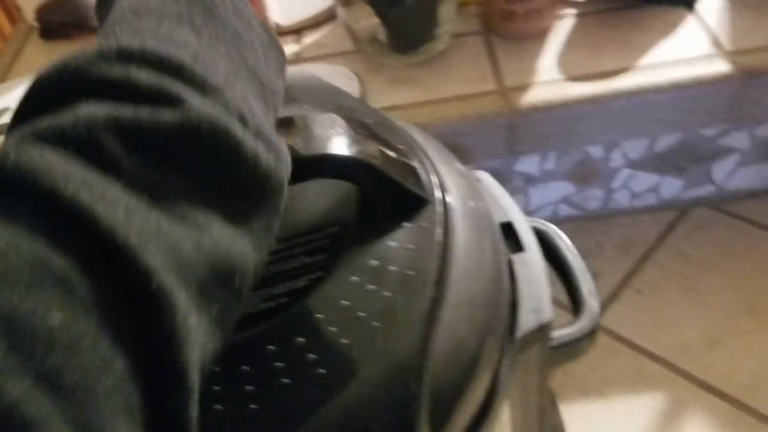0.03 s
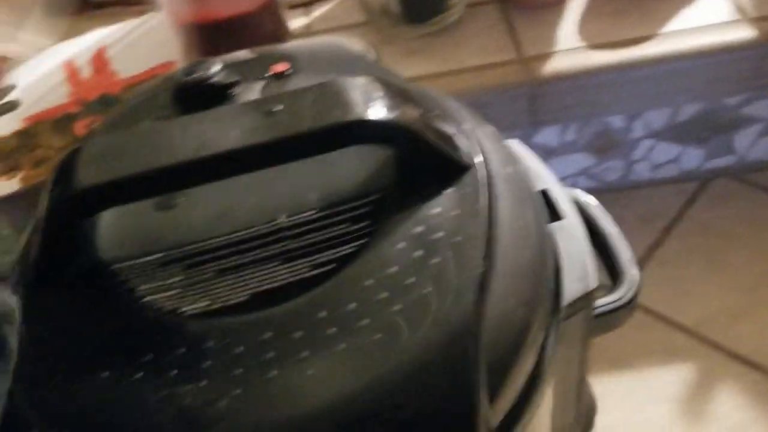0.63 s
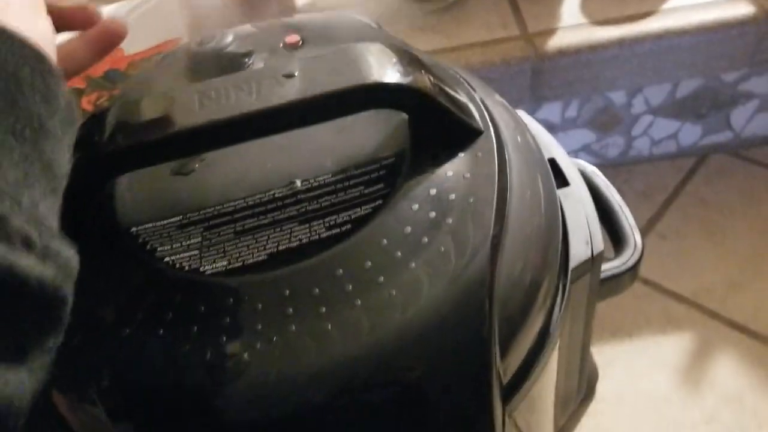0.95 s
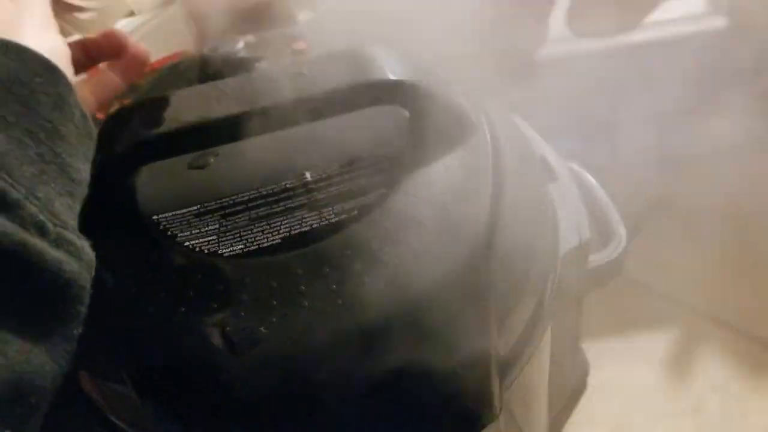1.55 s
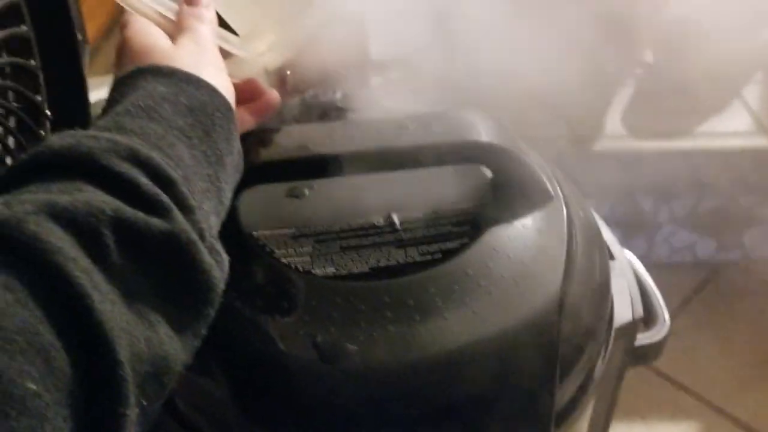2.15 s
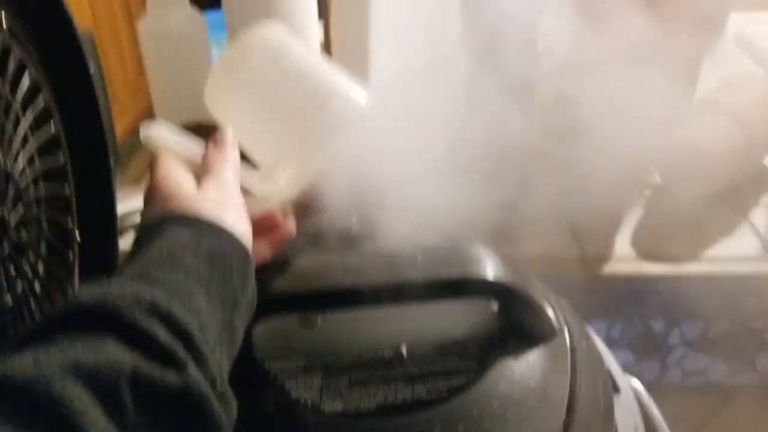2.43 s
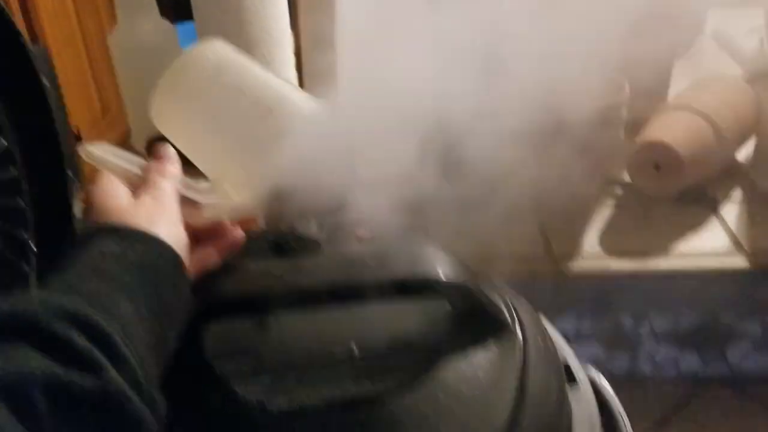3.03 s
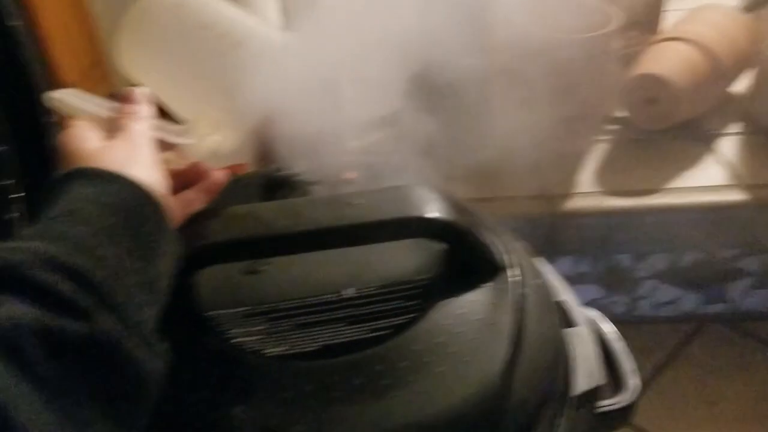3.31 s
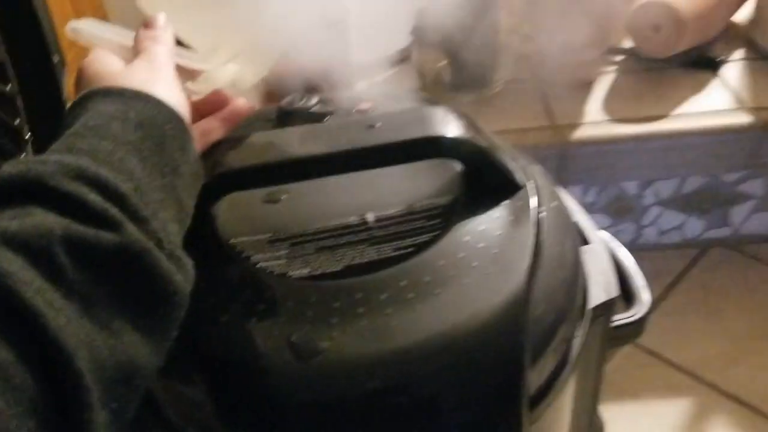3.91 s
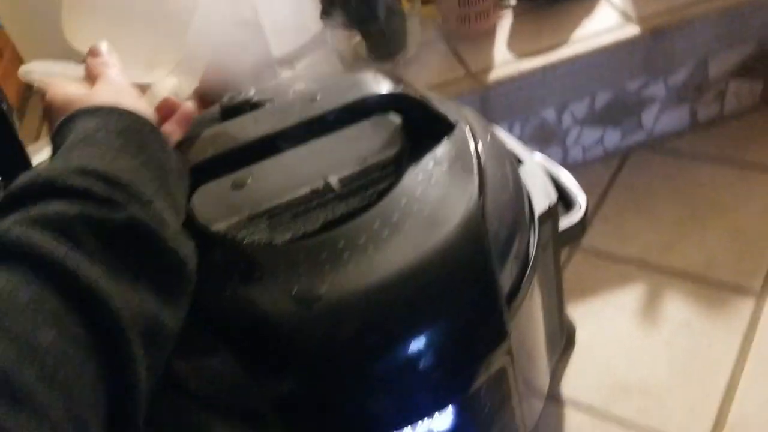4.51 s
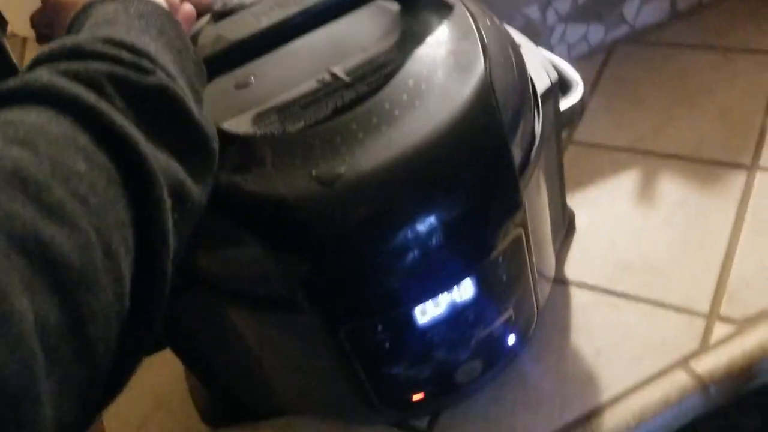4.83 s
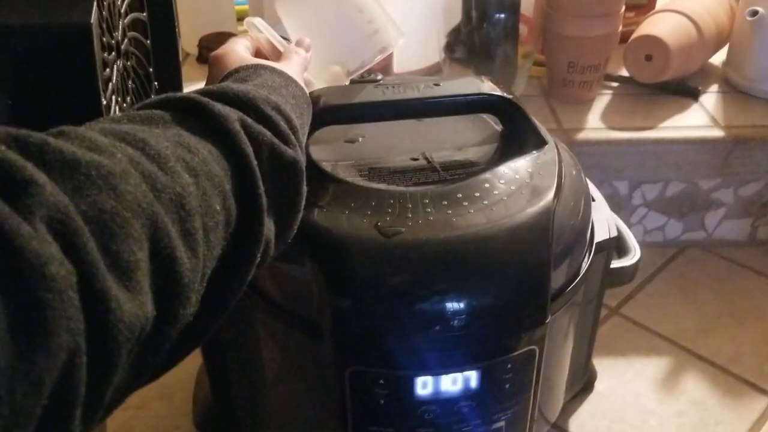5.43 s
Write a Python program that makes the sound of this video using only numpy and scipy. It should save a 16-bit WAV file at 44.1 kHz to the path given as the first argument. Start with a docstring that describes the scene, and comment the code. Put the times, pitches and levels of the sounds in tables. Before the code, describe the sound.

Steam escapes from a pressure cooker valve for the whole five and a half seconds, close to a hand-held stereo microphone in a small tiled kitchen. It is a bright, dense, spraying hiss with a weaker, dull roar underneath. Right at the start a short, hollow knock with a quick rattle rings the pot. The hiss is strongest here, and the valve spits once at about 0.3 seconds. Flecks of spray pop softly on the microphone, left at 0.5 seconds, right at 0.6, and more faintly left at 3.2. Thin, breathy whistles slide and swell within the hiss, most clearly around 1, 3.7 and 4.4 seconds. The tone shifts as the microphone turns, near 1.8 and 4 seconds. From about 4.6 seconds the hiss eases a little but keeps going. At around 5.4 seconds a sleeve faintly bumps and rubs the pot.

```python
"""A small tiled kitchen: steam blows out of the release valve of an electric pressure cooker.
The jet roars, hisses and sprays through the resonances of the valve cap and a cup held over it,
while a hand-held stereo microphone moves about close by. Knocks ring the pot at the start,
three flecks of spray pop on the microphone ports, and a sleeve rubs the pot near the end."""
import sys
import numpy as np
from scipy import signal
from scipy.fft import rfft, irfft
from scipy.io import wavfile
from scipy.ndimage import uniform_filter1d, map_coordinates

SR = 44100
rng = np.random.default_rng(int(sys.argv[2]) if len(sys.argv) > 2 else 0)


def dump_mix(stems):
    """Bounce the given channels to the path in sys.argv[1] as a 16-bit WAV at rate SR."""
    frames = np.atleast_2d(stems).T  # one column per channel
    limited = np.clip(frames, -1, 1)  # hard clip at full scale
    pcm = np.round(limited * 32767).astype(np.int16)
    wavfile.write(sys.argv[1], SR, pcm)


N = 245637
TIME = np.arange(N) / SR
HZ = np.maximum(np.fft.rfftfreq(N, 1 / SR), 1)

# microphone move: t/s, turn (0 facing the valve .. 1 turned furthest)
TURN = [(0, 1), (.75, 0.96), (1.3, 0.97), (1.68, 0.94), (1.95, 0.2), (3.2, 0.25), (3.85, 0.091),
        (4.35, 0.85), (5.57, 0.79)]
# pan (left minus right) of roar, hiss and spray: facing the valve/dB, added at full turn/dB
REGISTER_PANS = [(2, 0.5), (-4.6, 1), (2, 2.5)]


def steam(roar_room_db=1.0, hiss_room_db=2.5, spray_room_db=-4.5, hiss_from_hz=3320, spray_from_hz=8110):
    """The jet in three registers plus its resonances, each beamed its own way, with its own pan."""
    colour = valve_colour()
    turn, = in_time(TURN)
    near = near_echoes(irfft(rfft(jet()) * colour, N), turn)
    room = diffuse() * colour
    # roar and hiss reach the right port later as the microphone turns; the spray stays in step
    roar = rfft([near[0], delayed(near[1], ms=0.15 * turn)]) + from_db(roar_room_db) * room
    hiss = rfft([near[0], delayed(near[1], ms=0.16 * turn)]) + from_db(hiss_room_db) * room
    spray = rfft(near) + from_db(spray_room_db) * room
    spray *= panned(db=5 * (1 - below(13500, order=30)))  # the very top is beamed to the left
    under_hiss, under_spray = below(hiss_from_hz, order=12), below(spray_from_hz, order=60)
    registers = roar * under_hiss, hiss * (1 - under_hiss) * under_spray, spray * (1 - under_spray)
    out = np.zeros((2, N))
    for spectrum, db, (facing_db, turned_db) in zip(registers, jet_levels(), REGISTER_PANS):
        out += rms_one(irfft(spectrum, N)) * from_db(db) * panned(facing_db + turned_db * turn)
    return shimmer(out + cap_tones(irfft(hiss, N), irfft(spray, N)))


def jet(spit_db=1.06, spit_rate=350):
    """Wet steam: droplets tearing through the nozzle roughen the flow."""
    return rng.standard_normal(N) * from_db(spit_db * drift(spit_rate))


# fader ride of the jet at the microphone: t/s, nozzle hiss level/dB, fine spray level/dB
FLOW = [(0, -25, -23), (.245, -27.5, -27), (.295, -33, -26.5), (.42, -30, -25.5), (.54, -30, -24.5),
        (.84, -30.5, -25.5), (.92, -32.5, -25), (1.06, -31.5, -25), (1.3, -33, -27), (1.7, -32.5, -27.5),
        (1.87, -33.3, -29), (2.38, -32.5, -27), (2.52, -32.5, -27), (3.3, -32.5, -26.5), (3.72, -31, -27),
        (3.98, -31.5, -25.5), (4.07, -32.5, -28), (4.2, -29, -25.5), (4.64, -35.5, -28.5),
        (5.26, -35.5, -30.5), (5.57, -35, -30)]
# fader ride of the duller roar underneath: t/s, level/dB
ROAR = [(0, -38.5), (.35, -46), (.95, -42.5), (1.45, -44.5), (2.2, -45), (2.95, -45), (3.8, -42.5),
        (4.5, -43.5), (4.95, -44.5), (5.57, -43.5)]


def jet_levels(waver_db=0.72, waver_rate=5, spurt_hiss_db=3.5, spurt_spray_db=-2.5):
    """Roar, hiss and spray in dB: the valve spits once, and the whole flow wavers."""
    roar, = in_time(ROAR)
    hiss, spray = in_time(FLOW)
    spurt = swell(at_s=0.259, length_s=0.008)
    levels = np.array([roar, hiss + spurt_hiss_db * spurt, spray + spurt_spray_db * spurt])
    return levels + waver_db * drift(waver_rate)


# tone curve of the jet's turbulence: f/Hz, relative level/dB
TURBULENCE = [(20, -45), (60, -30.5), (160, -27.5), (230, -28), (400, -23.5), (600, -23), (1150, -26),
              (1450, -22), (2450, -14), (3050, -19), (3750, -14), (4600, -9.5), (5500, -3.5), (6300, -3),
              (7400, -0.5), (8900, -5), (12000, -1.5), (15800, -4)]
# steady resonances of the valve and its cap: f/Hz, width/Hz, boost/dB
VALVE_PEAKS = [(796, 36, 6.5), (1950, 160, 4.5), (7630, 39, 7.5), (10950, 190, 5.5)]


def valve_colour():
    """Gain per frequency: broad turbulence boosted at each resonance of the valve."""
    hz, db = np.transpose(TURBULENCE)
    boosts = sum(boost / (1 + (2 * (HZ - centre) / width) ** 2) for centre, width, boost in VALVE_PEAKS)
    return from_db(np.interp(np.log(HZ), np.log(hz), db) + boosts)


# gliding resonances of the valve and the cup over it, each a curve of t/s, f/Hz, level/dB
WHISTLE = [(0, 5400, -63), (.8, 5320, -41), (1.1, 5250, -41), (1.65, 5400, -41), (1.85, 5760, -60),
           (2.6, 5800, -50), (3.2, 5730, -47), (3.75, 5730, -41), (4.05, 5500, -53), (4.42, 5340, -33.5),
           (4.65, 5280, -38), (5.57, 5530, -50)]  # half-whistle low in the hiss, higher while the cup is close
RUSH = [(0, 5770, -34), (.12, 5900, -39), (.25, 6200, -26), (.29, 6250, -34), (.37, 6300, -33),
        (.46, 6240, -53), (.62, 6160, -43), (.85, 6300, -46), (1.0, 6400, -67), (1.7, 6400, -44),
        (1.9, 6570, -54), (2.65, 7300, -67), (3.2, 7100, -62), (3.95, 6700, -60), (4.2, 6450, -44),
        (4.55, 6280, -36), (5.57, 6320, -35.5)]  # broad rush of the jet's core
CORE = [(0, 6560, -50), (.3, 6700, -40), (.5, 6300, -54), (.85, 6600, -56), (1.3, 6280, -46),
        (1.74, 6420, -42), (1.9, 6450, -42), (2.15, 6530, -42), (2.55, 6340, -51), (3.0, 6500, -45),
        (3.5, 6400, -51), (4.3, 6100, -43), (4.9, 6320, -40.5), (5.57, 6300, -46)]  # narrow ring within the rush
UPPER_RING = [(3.9, 6550, -90), (4.1, 6500, -55), (4.4, 6620, -35), (4.7, 7130, -39.5), (5.3, 6670, -41.5),
              (5.57, 6750, -44)]  # rises above it as the microphone sinks beside the pot
KEEN = [(0, 7050, -58), (.24, 7200, -33), (.35, 7260, -54), (.58, 7150, -48), (.8, 6900, -47),
        (1.03, 6720, -35), (1.25, 6880, -57), (1.7, 7070, -40), (1.87, 6740, -44), (2.75, 6730, -43.5),
        (3.3, 6680, -47), (3.72, 6640, -31), (4.0, 6820, -39), (4.6, 6740, -49), (4.9, 6840, -44)]  # keen note beamed to the left
SIZZLE = [(.14, 7590, -37.5), (.33, 7600, -46), (.56, 7530, -33.5), (.84, 7650, -37), (1.0, 7670, -48),
          (1.9, 7800, -51), (3.2, 8100, -41), (3.72, 7650, -45), (4.25, 7850, -43), (4.6, 7850, -43),
          (5.57, 7700, -56)]  # the valve's edge, strongest while the pressure is highest
HOLLOW = [(0, 2050, -53), (.35, 2100, -52), (.9, 2150, -53), (1.35, 2160, -46.5), (1.9, 2160, -46.5),
          (2.7, 2160, -50), (3.8, 2120, -51), (4.35, 2170, -55), (4.9, 2110, -48.5), (5.57, 2200, -58)]  # hollow note of the cap
THIN = [(1.2, 10000, -64), (1.7, 9870, -47), (2.5, 9800, -51), (3.3, 9670, -48), (3.72, 9700, -37),
        (4.1, 9320, -52), (5, 10000, -53)]  # thin note in the spray while the cup is in the jet
OVERTONE = [(.4, 11600, -48), (.55, 11700, -35), (.85, 12160, -47), (1.2, 11800, -56), (1.7, 11200, -39),
            (1.95, 11900, -56), (3.8, 11600, -53), (4.9, 11600, -61)]  # high glint that glides up after the opening burst
TOP_OVERTONE = [(0, 13000, -51), (.35, 13100, -54), (.52, 13100, -34), (.68, 12700, -44), (.92, 12900, -39),
                (1.15, 13400, -50), (1.9, 12600, -51), (2.7, 12260, -44), (4.9, 12500, -61)]  # a second glint above it
# resonances fed by the hiss and by the spray: curve, width/Hz, pan/dB
HISS_TONES = [(WHISTLE, 230, -2), (RUSH, 810, -31.5), (CORE, 63, -13), (UPPER_RING, 98, -20),
              (KEEN, 150, 60), (SIZZLE, 220, 11)]
SPRAY_TONES = [(HOLLOW, 132, 9.5), (THIN, 77, 9.1), (OVERTONE, 280, 18), (TOP_OVERTONE, 220, 10)]


def cap_tones(hiss, spray):
    """Cavities pick breathy tones out of the flow; they slide and swell as cup and microphone move."""
    out = np.zeros((2, N))
    for flow, tones in ((hiss, HISS_TONES), (spray, SPRAY_TONES)):
        for curve, width, pan_db in tones:
            hz, db = in_time(curve)
            out += gliding_band(flow, hz, width) * from_db(db) * panned(pan_db)
    return out


# close reflections, lid to left and right port, then counter to left and right:
# starting delay/ms, slide/(ms per s), added at full turn/ms
ECHOES = [(0.661, 0.0596, -0.19), (0.892, -0.104, -0.058), (1.08, -0.021, 0.0083), (0.981, 0.0266, 0.035)]


def near_echoes(x, turn, lid_db=-11, counter_db=-14, sway_ms=0.055, sway_rate=0.88):
    """Direct sound and two reflections: a comb that sweeps as the hand travels, turns and sways."""
    paths_ms = [ms + ms_per_s * TIME + turned_ms * turn + sway_ms * drift(sway_rate)
                for ms, ms_per_s, turned_ms in ECHOES]
    off_lid, off_counter = delayed(x, paths_ms).reshape(2, 2, N)
    return x + from_db(lid_db) * off_lid + from_db(counter_db) * off_counter


def shimmer(x, slow_db=2.7, fast_db=2.0, flicker_from_hz=7000, size=1024):
    """Narrow bands of the steam swell and fade slowly at each port; the treble also flickers at both."""
    hz, _, cells = signal.stft(x, SR, nperseg=size)

    def patches(channels, length_s, bins):
        """Random field of spread 1, smooth in time and frequency."""
        field = rng.standard_normal((channels, *cells.shape[1:]))
        for _ in range(2):
            field = uniform_filter1d(field, max(1, int(length_s * 2 * SR / size)), axis=2, mode="wrap")
            field = uniform_filter1d(field, bins, axis=1, mode="wrap")
        return field / field.std()

    treble = (hz ** 4 / (hz ** 4 + flicker_from_hz ** 4))[:, None]
    depth = np.interp(hz, [0, 5000], [.35, 1])[:, None]  # long waves change less as the hand moves
    swell_db = slow_db * depth * patches(channels=2, length_s=.25, bins=2)
    flicker_db = fast_db * treble * patches(channels=1, length_s=.025, bins=15)
    return signal.istft(cells * from_db(swell_db + flicker_db), SR, nperseg=size)[1][:, :N]


# hits on the pot: t/s, relative level/dB, contact softness/ms
KNOCKS = [(0.0347, -18, 0.062), (0.0425, -49, 0.18), (0.052, -33, 0.36), (.066, -28, 0.97), (.097, -22, 2),
          (0.272, -43.5, 0.23)]
# ring of the pot and lid: f/Hz, relative level/dB, t60/s
POT_MODES = [(223, -14.5, 0.1), (316, -8, 0.24), (363, -4.5, 0.19), (398, 1, 0.049), (500, -3.5, 0.07),
             (643, 7.5, 0.026), (708, 10, 0.024), (883, 4, 0.029), (933, -3, 0.072), (1060, -5, 0.033),
             (1260, -16, .08), (1435, -12, 0.037)]


def knocks(level_db=-5.5, room_db=-5.0, pan_db=4.0):
    """Hits ring the pot; a soft contact is a long push that misses the higher modes."""
    force = np.zeros(N)
    for s, db, soft_ms in KNOCKS:
        push = np.exp(-np.abs(TIME - s) * 1000 / soft_ms) * (TIME >= s)
        force += from_db(db) * push / push.sum()
    body = sum((-1) ** k * from_db(db) * ring(force, hz, t60) for k, (hz, db, t60) in enumerate(POT_MODES))
    tail = signal.fftconvolve(body[None], kitchen(), axes=1)[:, :N]
    return from_db(level_db) * (body * panned(pan_db) + from_db(room_db) * tail)


# flecks of spray on a port: t/s, level/dB, pan/dB, low-pass f/Hz
POPS = [(0.4778, -20.5, 36, 1500), (.599, -19.5, -29, 1500), (3.231, -23.5, 32, 600)]


def pops(swing_hz=58, swing_s=0.011, spike_s=0.0012, spike_share=0.6):
    """A fleck on a port gives a pressure spike, then the diaphragm swings back slowly."""
    out = np.zeros((2, N))
    for s, db, pan_db, top_hz in POPS:
        age = np.maximum(TIME - s, 0)
        swing = np.exp(-age / swing_s) * np.cos(2 * np.pi * swing_hz * age + np.pi / 3)
        push = (TIME >= s) * (spike_share * np.exp(-age / spike_s) + (1 - spike_share) * swing)
        lowpass = signal.butter(2, top_hz, fs=SR, output="sos")
        out += from_db(db) * signal.sosfilt(lowpass, push + 1e-18) * panned(pan_db)
    return out


def sleeve(band_hz=(195, 400), grip_db=-1.5, grip_rate=60, bump_db=-47.5, drag_db=-55.5):
    """Cloth bumps and drags on the pot, gripping and slipping; the shell passes only a dull rumble."""
    drag_from_s, drag_to_s, fade_s = 5.34, 5.57, .03
    band = signal.butter(3, band_hz, "band", fs=SR, output="sos")
    friction = rng.standard_normal(N) * from_db(grip_db * drift(grip_rate))
    rub = rms_one(signal.sosfilt(band, friction))
    bump = swell(at_s=5.372, length_s=0.012)
    drag = np.clip(np.minimum(TIME - drag_from_s, drag_to_s - TIME) / fade_s, 0, 1)
    return rub * (from_db(bump_db) * bump + from_db(drag_db) * drag)


def kitchen(t60_s=0.16, predelay_s=.004):
    """The tiled room's short answer to a click, at both ports."""
    tail = irfft(diffuse(), N) * from_db(-60 * TIME / t60_s) * (TIME > predelay_s)
    return rms_one(tail)[:, :SR // 2] / np.sqrt(N)


def diffuse(alike_below_hz=450):
    """Spectra of sound arriving from all round the room; long waves reach both ports alike."""
    mid, side = rfft(rng.standard_normal((2, N)))
    alike = below(alike_below_hz, order=2)
    return (np.sqrt(1 + alike) * mid + np.sqrt(1 - alike) * side * [[1], [-1]]) / np.sqrt(2)


def draught(level_db=-71, band_hz=(40, 120), gust_db=3.5, gust_rate=4.8):
    """Stirred air brushes each port with a faint rumble of its own."""
    band = signal.butter(2, band_hz, "band", fs=SR, output="sos")
    rumble = rms_one(signal.sosfilt(band, rng.standard_normal((2, N))))
    return rumble * from_db(level_db + gust_db * drift(gust_rate))


def from_db(db):
    """Decibels to gain."""
    return 10 ** (np.asarray(db) / 20)


def rms_one(x):
    """Each channel scaled to rms 1."""
    return x / np.sqrt(np.mean(x ** 2, axis=-1, keepdims=True) + 1e-20)


def in_time(rows):
    """The columns of a curve table at every sample."""
    s, *columns = np.transpose(rows)
    return [np.interp(TIME, s, c) for c in columns]


def panned(db):
    """Constant-power gains for a pan given as left minus right in dB."""
    pair = from_db(np.array([db, -db]).reshape(2, -1) / 2)
    return pair / np.sqrt(np.mean(pair ** 2, axis=0))


def drift(rate, hop=40):
    """Smooth random wander of spread 1 that changes about rate times a second."""
    r = np.exp(-2 * np.pi * hop * rate / SR)
    slow = signal.lfilter([1], [1, -2 * r, r * r], rng.standard_normal(N // hop + 2002))[2000:]
    return np.interp(np.arange(N) / hop, np.arange(len(slow)), rms_one(slow))


def swell(at_s, length_s):
    """A smooth rise and fall of height 1."""
    return np.exp(-((TIME - at_s) / length_s) ** 2)


def below(edge_hz, order):
    """Soft edge over frequency: 1 under edge_hz, 0 above."""
    return 1 / (1 + (HZ / edge_hz) ** order)


def delayed(x, ms):
    """x heard ms later; the delay may move, and several rows of delays give several copies."""
    return map_coordinates(x, [np.arange(N) - np.asarray(ms) * SR / 1000], order=3, mode="wrap")


def ring(clicks, hz, t60):
    """A unit click sets a sine of height 1 ringing."""
    r, w = from_db(-60 / (t60 * SR)), 2 * np.pi * hz / SR
    return signal.lfilter([0, np.sin(w)], [1, -2 * r * np.cos(w), r * r], clicks + 1e-18)


def gliding_band(x, hz, width_hz):
    """Band-pass around a moving centre: shift down, smooth, shift back; rms 1."""
    carrier = np.exp(2j * np.pi * np.cumsum(hz) / SR)
    r = np.exp(-2 * np.pi * width_hz / SR)
    band = signal.filtfilt([(1 - r) ** 2], [1, -2 * r, r * r], x / carrier, padtype="even", padlen=SR // 20)
    return rms_one((band * carrier).real)


def scene():
    """Steam up front, with knocks, sleeve, pops and draught under it."""
    return steam() + knocks() + sleeve() + pops() + draught()


def record(dry, cutoff_hz=15700):
    """A steep low-pass takes off the very top."""
    return signal.sosfilt(signal.ellip(12, .1, 90, cutoff_hz, fs=SR, output="sos"), dry)


dry = scene()
out = record(dry)
dump_mix(out)
```